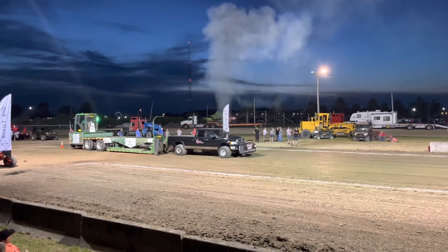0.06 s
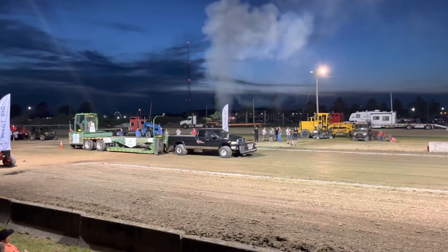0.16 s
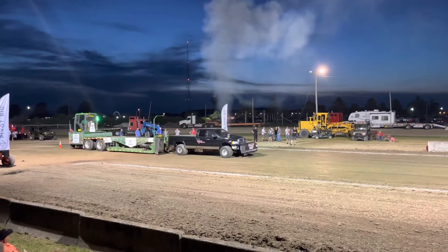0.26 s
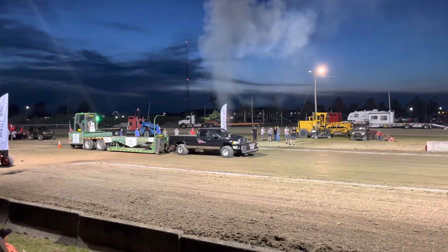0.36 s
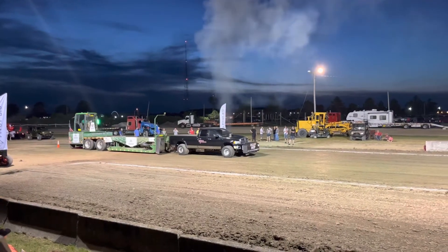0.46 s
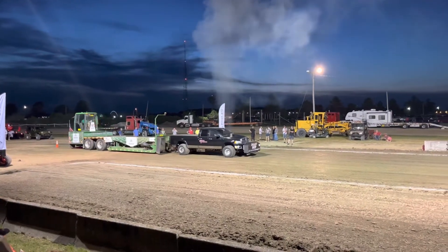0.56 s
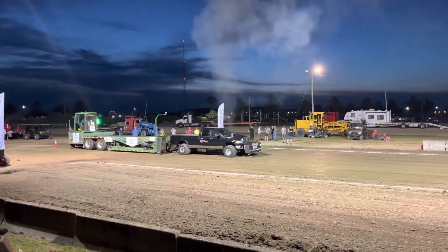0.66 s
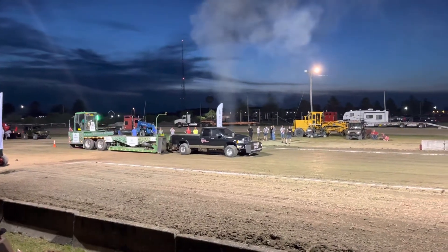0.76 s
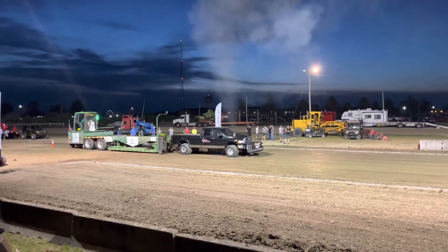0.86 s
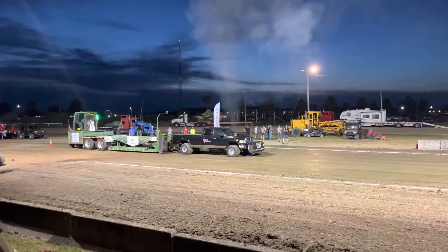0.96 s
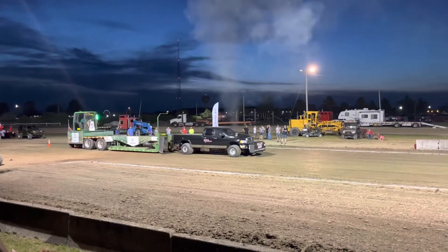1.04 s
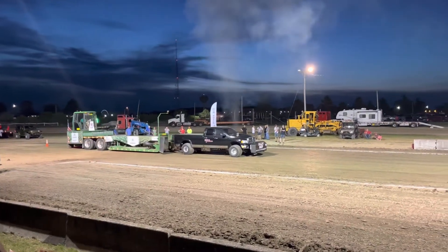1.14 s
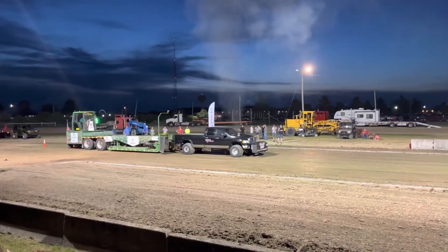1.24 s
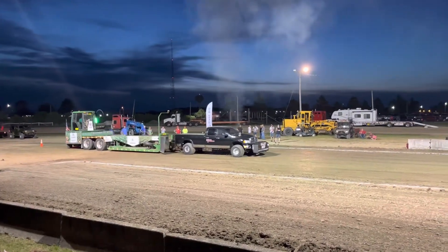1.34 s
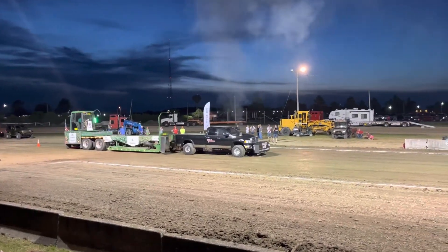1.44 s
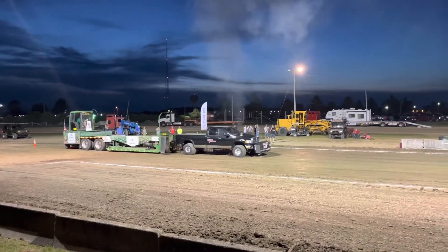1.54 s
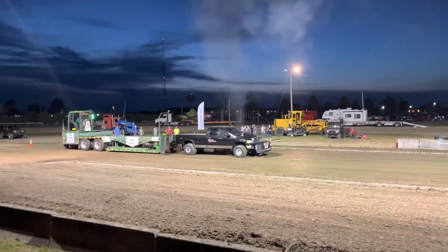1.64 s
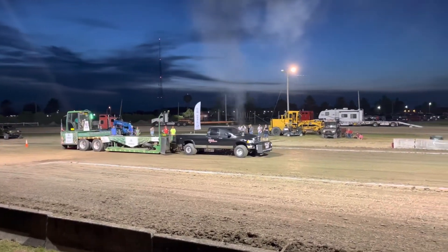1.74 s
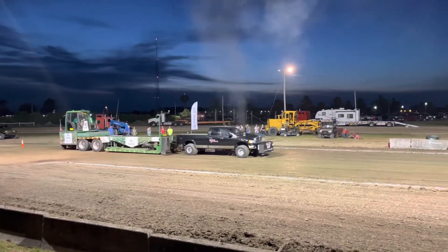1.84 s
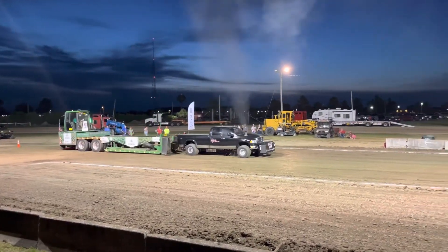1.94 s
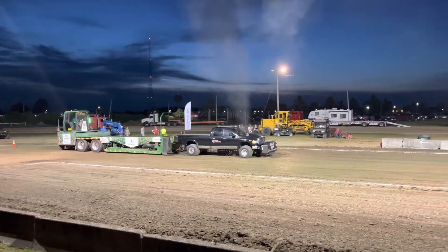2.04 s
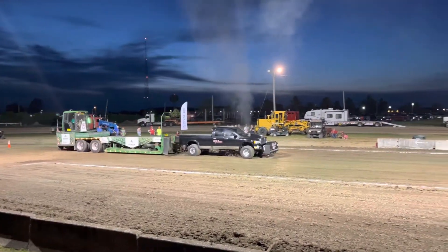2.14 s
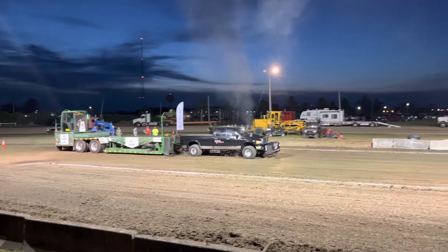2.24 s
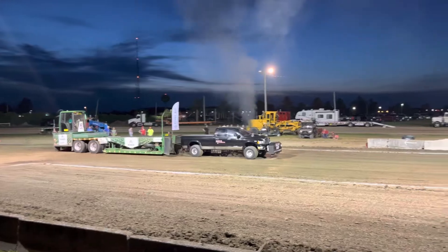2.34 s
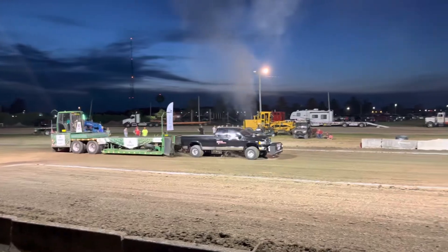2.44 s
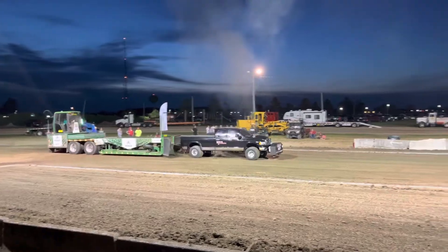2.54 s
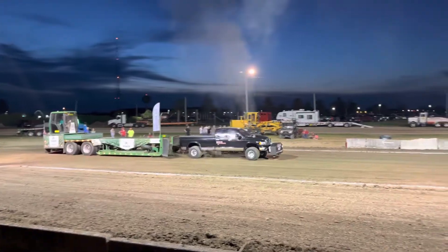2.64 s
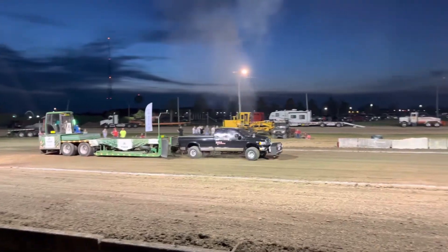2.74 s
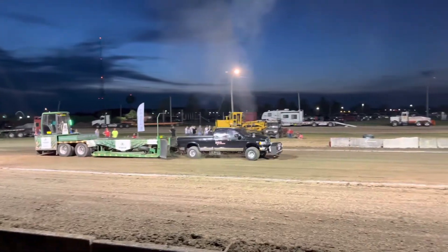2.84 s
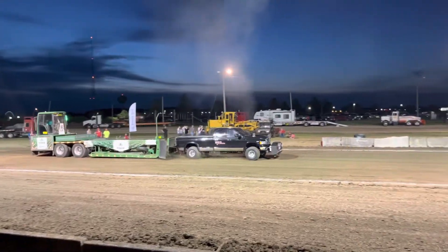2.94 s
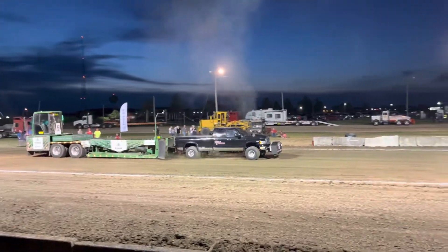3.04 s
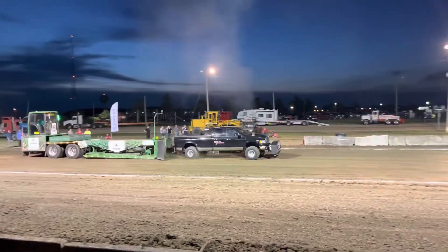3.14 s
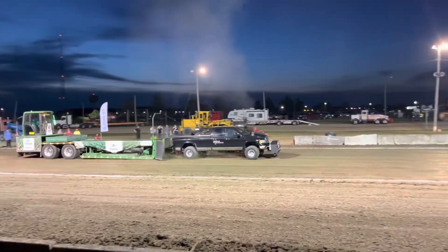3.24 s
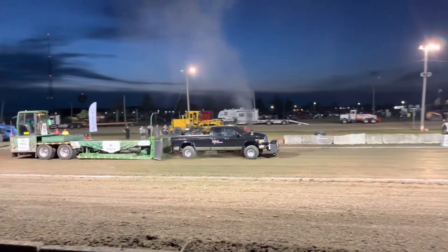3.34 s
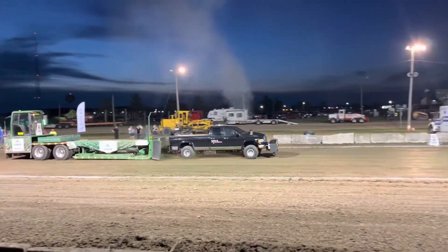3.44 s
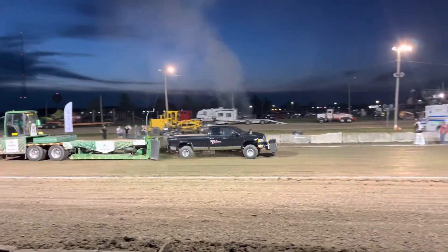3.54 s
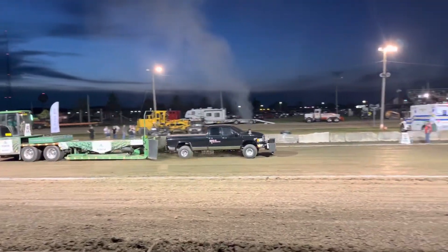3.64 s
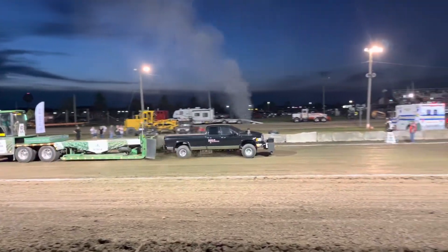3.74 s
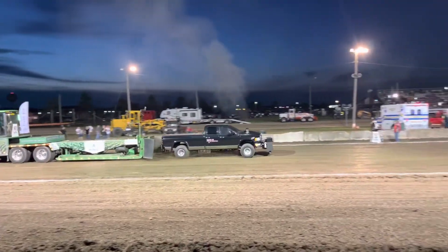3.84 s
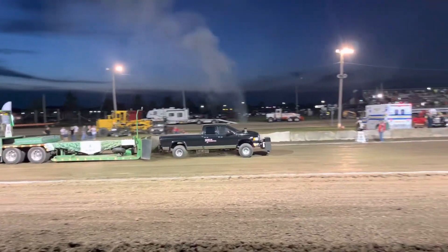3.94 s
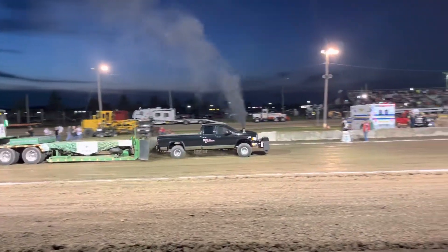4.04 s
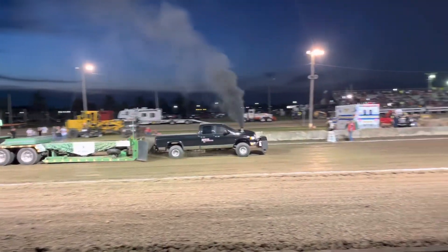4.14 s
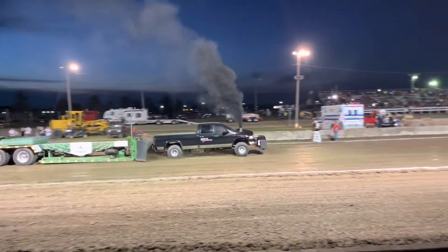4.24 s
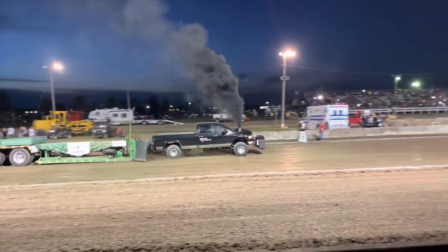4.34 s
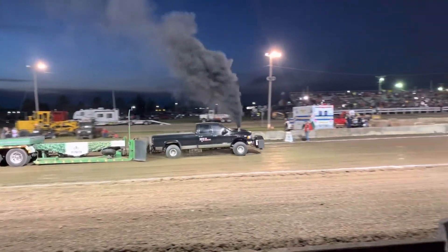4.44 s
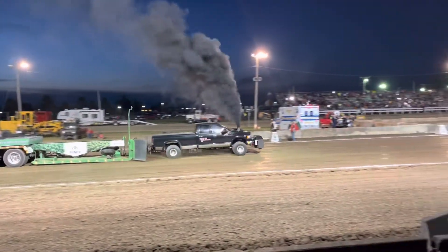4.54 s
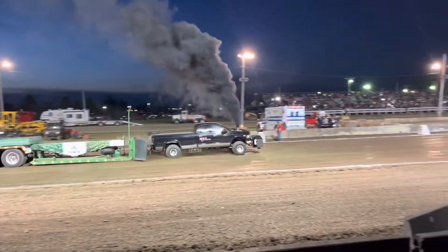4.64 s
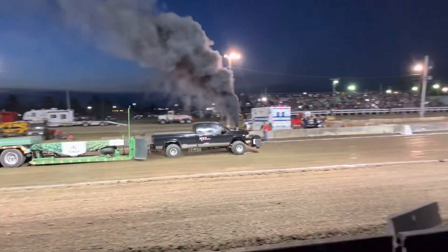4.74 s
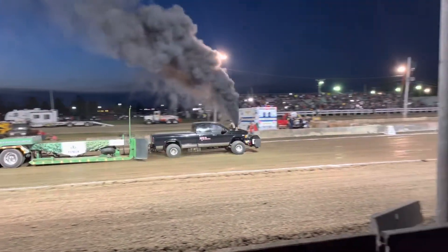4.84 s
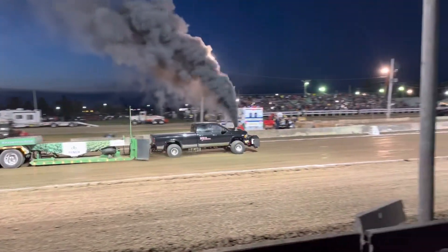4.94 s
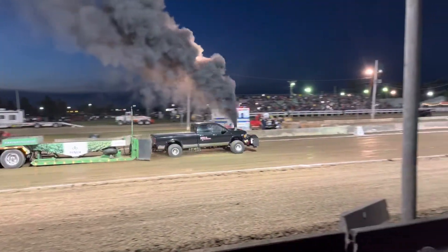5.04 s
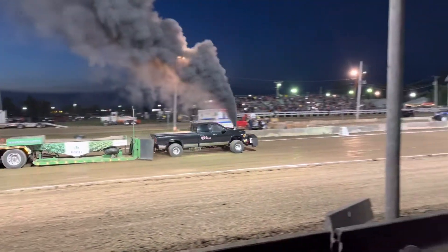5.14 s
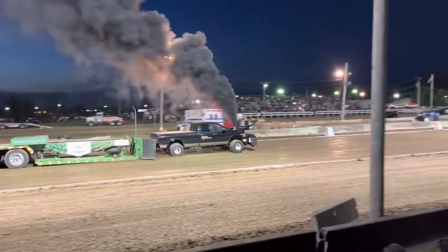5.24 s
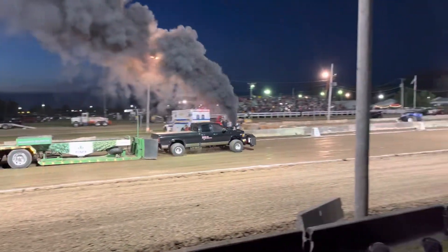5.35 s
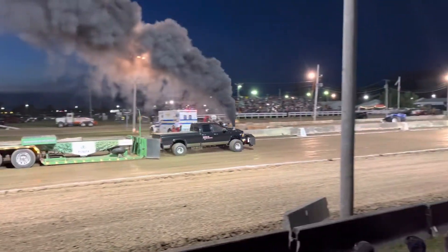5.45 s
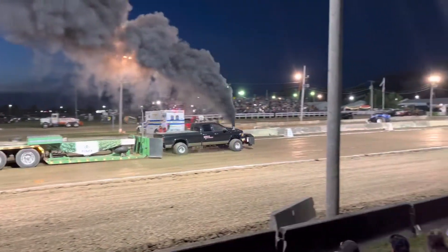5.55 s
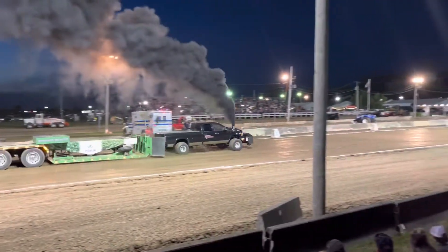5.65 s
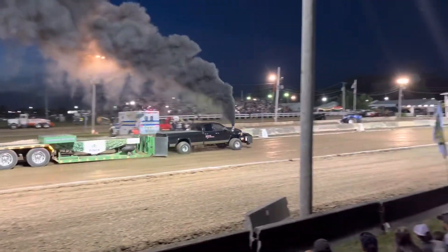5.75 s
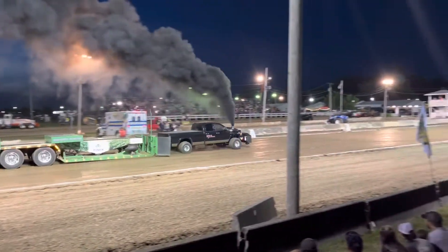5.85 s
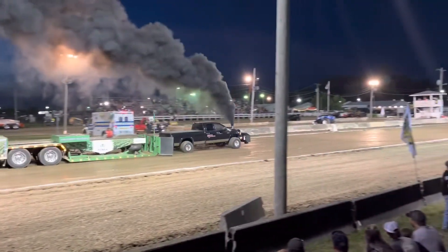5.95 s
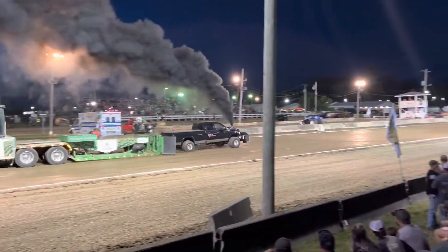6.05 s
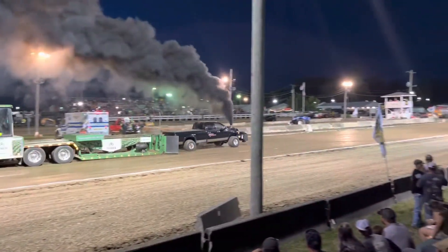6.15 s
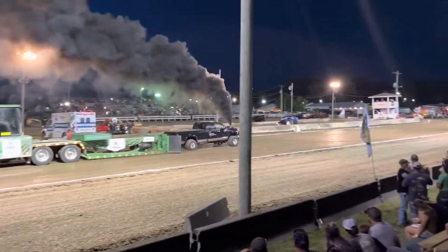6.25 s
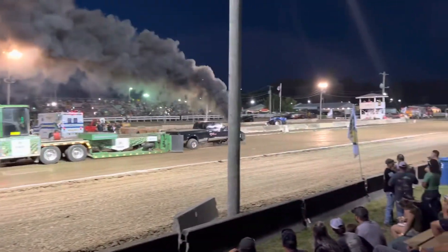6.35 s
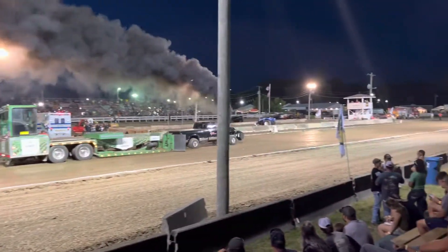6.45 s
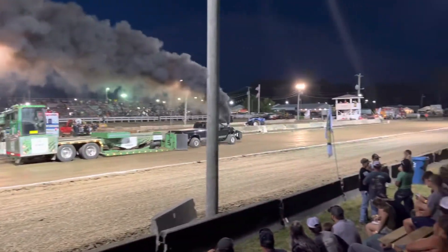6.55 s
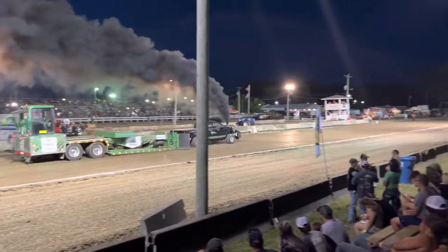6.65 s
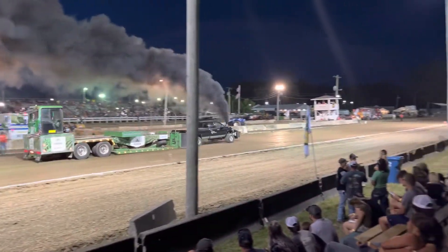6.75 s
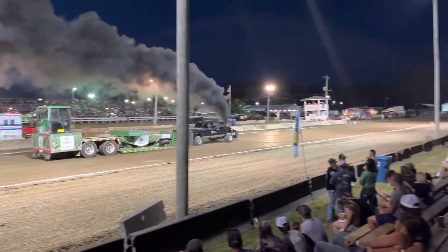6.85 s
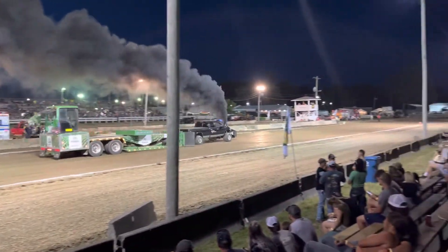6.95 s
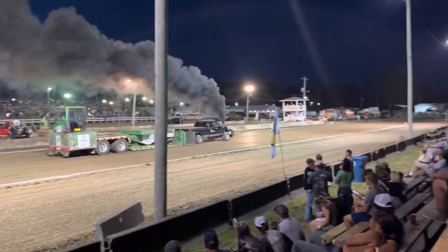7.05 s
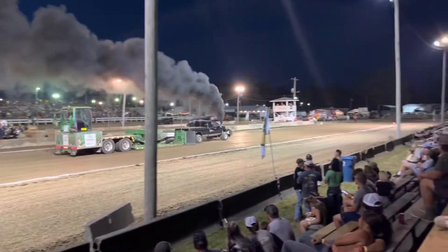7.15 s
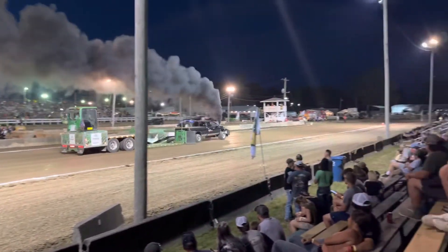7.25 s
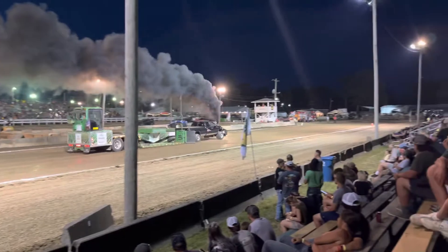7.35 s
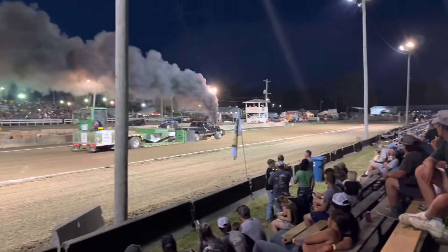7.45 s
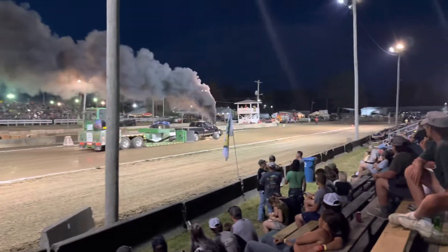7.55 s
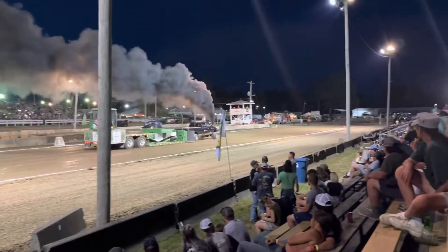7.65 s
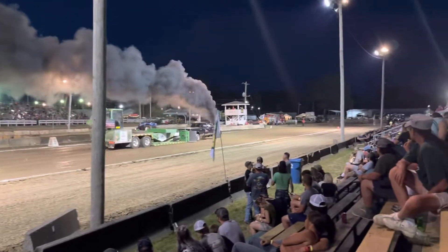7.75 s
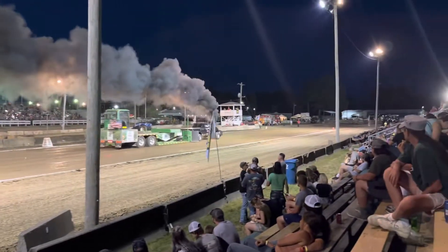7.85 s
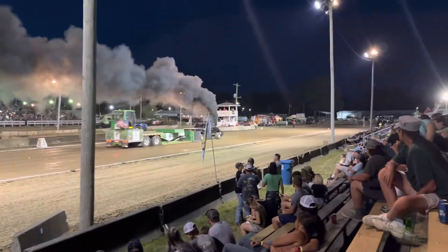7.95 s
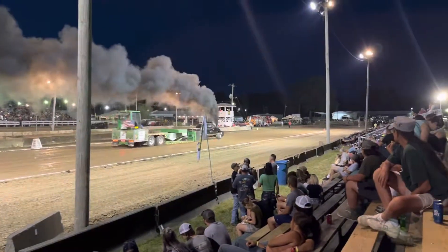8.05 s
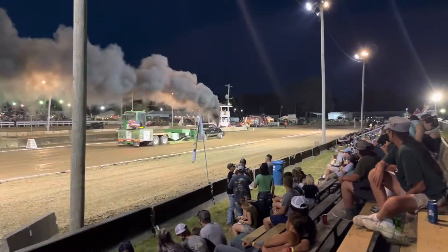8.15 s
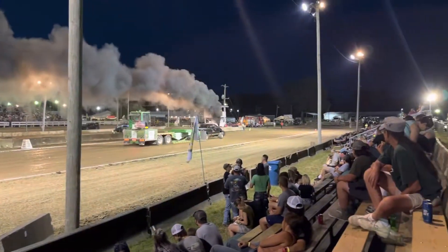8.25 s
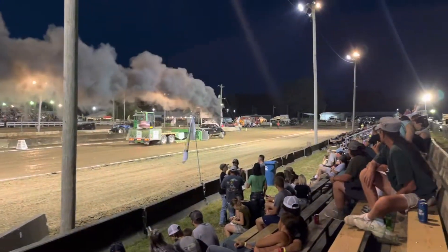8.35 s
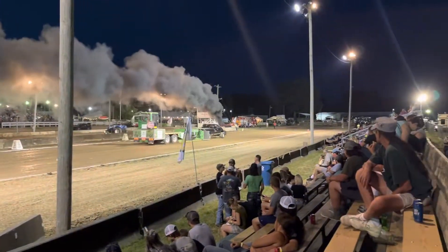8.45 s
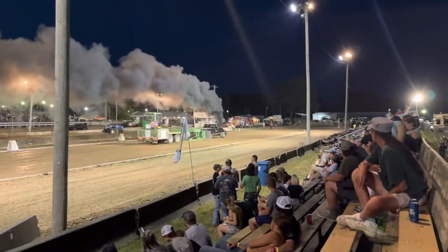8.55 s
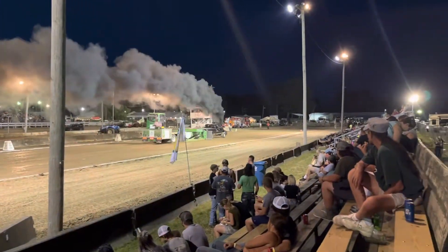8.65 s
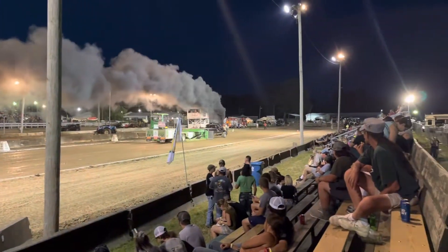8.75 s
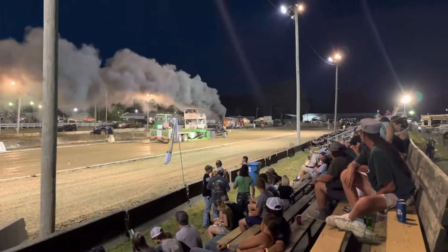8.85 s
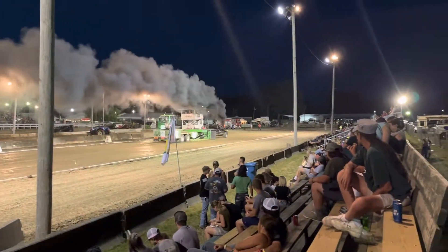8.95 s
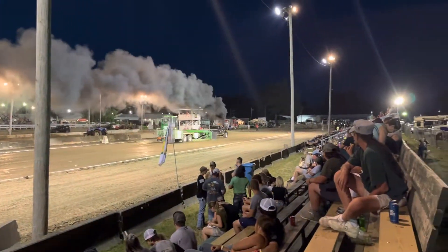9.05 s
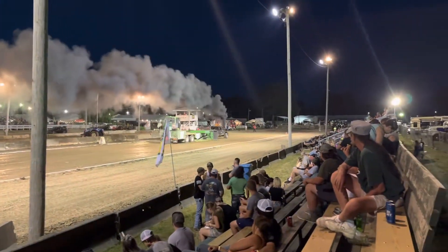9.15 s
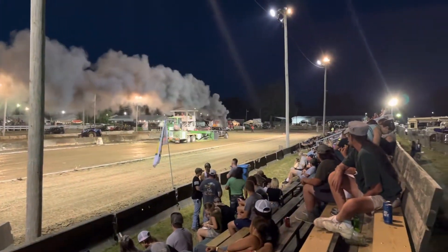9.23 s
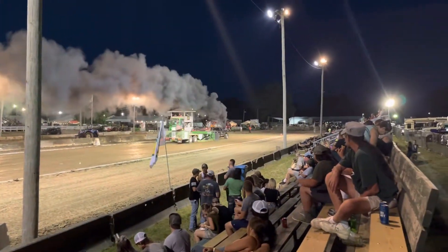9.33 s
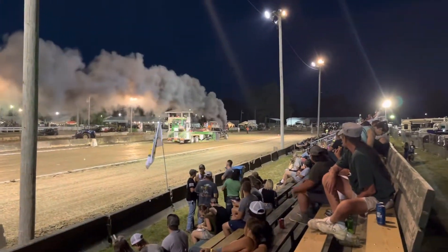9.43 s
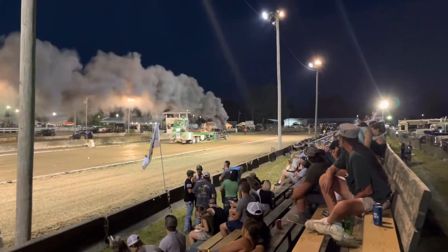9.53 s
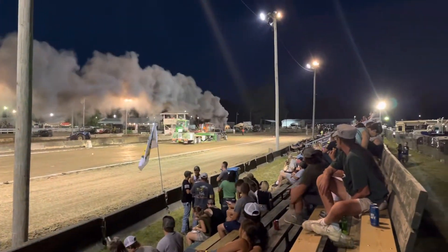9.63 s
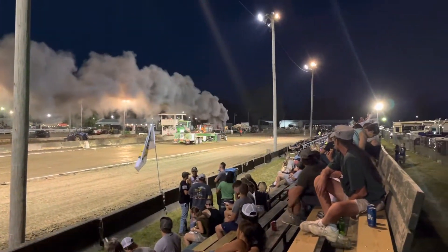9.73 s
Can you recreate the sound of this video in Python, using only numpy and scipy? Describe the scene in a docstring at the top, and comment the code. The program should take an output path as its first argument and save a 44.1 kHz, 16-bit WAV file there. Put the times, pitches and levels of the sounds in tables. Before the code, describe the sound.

Continuous full-throttle diesel engine dragging a weight sled outdoors. The dense, rasping drone grows barkier alongside the listener, wavers through several rapid rev surges around the middle, drops in pitch, then climbs back and holds while moving away. Treble hiss and turbo whistle thin out; low rumble and a soft echo off ground and stands remain. Small stereo microphone in the spectator seats.

```python
"""A diesel exhaust blares at its firing rate, rough and barking, under a turbo whistle: a six-cylinder truck
drags a weight sled down a dirt track at full throttle. Revs swell gently, then surge as the tyres slip and
bite; the truck draws away and turns duller. Crank orders are shaken tones; bark, rasp and hiss are noise
puffed once per firing; the whistle is a gliding narrow band. Rumble, a steady low drone, a ground echo and
a grandstand tail surround them."""
import sys
import numpy as np
from scipy import signal
from scipy.fft import rfft, irfft, next_fast_len
from scipy.io import wavfile
from scipy.ndimage import map_coordinates

SR = 44100
rng = np.random.default_rng(int(sys.argv[2]) if len(sys.argv) > 2 else 0)


def materialize(psi):
    """Save the field psi as 16-bit PCM at rate SR to the path in sys.argv[1].

    A 1-D psi becomes a single channel; in a 2-D psi each row is a channel.
    """
    bounded = np.clip(np.atleast_2d(psi).T, -1, 1)
    quanta = np.round(bounded * 32767).astype(np.int16)
    wavfile.write(sys.argv[1], SR, quanta)


N = 431738


def from_db(db):
    """Amplitude factor for a level in dB."""
    return np.exp(np.asarray(db) * (np.log(10) / 20))


def rms_one(x):
    """Scale to rms 1."""
    return x / np.sqrt(np.mean(x ** 2) + 1e-20)


def in_time(rows):
    """Columns of a curve (time [s], ...), interpolated to every sample."""
    time_s, *columns = np.transpose(rows)
    return [np.interp(np.arange(N) / SR, time_s, column) for column in columns]


def drift(rate_hz):
    """Slow chance, rms 1: noise through two equal poles at rate_hz, run at SR / 40."""
    step, settle = 40, 2000
    pole = np.exp(-2 * np.pi * rate_hz * step / SR)
    noise = rng.standard_normal(N // step + settle + 2)
    slow = signal.lfilter([1], [1, -2 * pole, pole ** 2], noise)[settle:]
    return np.interp(np.arange(N) / step, np.arange(len(slow)), rms_one(slow))


def colour(x, spectrum, turn=1):
    """Filter by (frequency [Hz], gain [dB]) over log frequency; turn is a common phase factor."""
    size = next_fast_len(N + SR // 10)
    hz, db = np.transpose(spectrum)
    log_hz = np.log(np.maximum(np.fft.rfftfreq(size, 1 / SR), 1))
    gain = from_db(np.interp(log_hz, np.log(hz), db))
    return irfft(rfft(x, size) * gain * turn, size)[..., :N]


def band(x, spectrum):
    """Filter by a spectrum that closes off steeply past both ends; rms 1."""
    low_end = (spectrum[0][0] / 2, -90)
    high_end = (spectrum[-1][0] * 2, -90)
    return rms_one(colour(x, [low_end, *spectrum, high_end]))


def at_place(values, place):
    """Blend values for approaching, alongside and far off."""
    return np.interp(place, range(len(values)), values)


def blend_places(shape, spectra, place):
    """Crossfade the signals that shape() makes from each place's spectrum."""
    hz, *by_place = np.transpose(spectra)
    blend = 0
    for k, db in enumerate(by_place):
        weight = np.maximum(1 - abs(place - k), 0)
        blend = blend + weight * shape(list(zip(hz, db)))
    return blend


def turning_band(x, spectra, place):
    """Band colour turns as the truck goes by."""
    return blend_places(lambda spectrum: band(x, spectrum), spectra, place)


# truck position: (time [s], place [0 approaching, 1 alongside, 2 and over far off])
TRACK_PLACE = [(0, 0), (1.4, 0.07), (2.2, 0.5), (3.7, 0.9), (5, 1.3), (5.7, 1.6), (6.2, 2), (9.79, 3)]


def track_place():
    """Place along the track, held at far off once reached."""
    place, = in_time(TRACK_PLACE)
    return np.clip(place, 0, 2)


# crank speed that sled drag allows while the tyres grip: (time [s], speed [turns/s])
LOADED_SPEED = [(0.0, 72.1), (0.44, 70.9), (1.58, 70.4), (2.29, 68.0), (3.34, 67.0), (3.63, 69.8),
                (4.25, 69.2), (5.19, 71.5), (5.69, 62.6), (6.13, 60.3), (6.56, 59.7), (7.36, 67.5),
                (8.61, 67.7), (9.15, 66.4), (9.79, 66.2)]


def loaded_speed():
    """Crank speed under the sled's drag, without surges."""
    return in_time(LOADED_SPEED)[0]


# surges and gentle swells of the revs: (time of top [s], rise [turns/s], length [s])
REV_SURGES = [(2.62, 1.5, 0.72), (2.92, 2.1, 0.3), (3.16, 2.1, 0.35), (3.47, 4.2, 0.31), (3.86, 3.8, 0.44),
              (4.5, 17.2, 0.63), (4.93, 14.8, 0.53), (5.41, 16.0, 0.46), (5.85, 8.4, 0.46),
              (6.34, 6.4, 0.41), (6.77, 2.6, 0.44), (7.88, 1.4, 0.22), (8.15, 1.6, 0.25), (8.74, 1.9, 0.23),
              (9.01, 3.2, 0.29), (9.36, 5.2, 0.36)]
WOBBLE_SHARE, WOBBLE_HZ = 0.001498, 4.05


def crank_speed():
    """Turns per second: loaded speed, rounded surges and gentle swells, and a slight wobble."""
    t = np.arange(N) / SR
    speed = loaded_speed()
    for top_s, rise, length_s in REV_SURGES:
        half_turns = np.clip((t - top_s) / length_s, -.5, .5)
        speed = speed + rise * np.cos(np.pi * half_turns) ** 2
    return speed * (1 + WOBBLE_SHARE * drift(WOBBLE_HZ))


def crank_turns(speed):
    """Crank angle in turns: speed summed, with fine unsteadiness."""
    return np.cumsum(speed * (1 + .0015 * drift(20))) / SR


# low drone spectrum, peak around the truck's crank rate: (frequency [Hz], level [dB per Hz])
DRONE_SPECTRUM = [(22, -34), (40, -18), (63, 3), (85, -9), (110, -2), (160, -17), (300, -10)]


def low_drone():
    """Steady low noise around 63 Hz, near the truck's crank rate, that stays as the truck leaves."""
    return from_db(-47.5) * band(rng.standard_normal((2, N)), DRONE_SPECTRUM)


def grandstand(x, t60_s, wall_hz):
    """Thin, dull tail scattered by the stands: two unrelated decaying noise rows, as strong as x."""
    t = np.arange(SR) / SR
    decay = from_db(-60 * t / t60_s) * (t > .03)
    tail = rng.standard_normal((2, SR)) * decay
    tail = signal.sosfilt(signal.butter(1, wall_hz, fs=SR, output="sos"), tail)
    return rms_one(signal.fftconvolve(x[None], tail, axes=1)[:, :N]) * np.std(x)


# echo delay, longest about when the truck is alongside: (time [s], lag [s])
GROUND_LAG = [(0, .00184), (.8, .00187), (2.25, .00202), (2.9, .00218), (4.15, .00278), (6.05, .00208),
              (6.5, .00192), (7.1, .00178), (8.4, .00164), (9.79, .0016)]


def ground_echo(x, share, dull_hz):
    """A dulled bounce off the track combs the sound; the comb slides as the lag changes."""
    lag_s, = in_time(GROUND_LAG)
    now = np.arange(N)
    dulled = colour(x, [(dull_hz / 2, 0), (dull_hz, -3), (2 * dull_hz, -20)])
    late = np.array([np.interp(now - lag_s * SR, now, row) for row in dulled])
    return x + share * late


def shocks(crank, size=630):
    """Ragged gas burst repeated every crank turn, as cylinders empty alike each time."""
    burst = rng.standard_normal(size)
    repeated = map_coordinates(burst, [crank % 1 * size], order=1, mode="grid-wrap")
    return repeated * np.sqrt(3 / 2)  # restores power lost to interpolation


# puff strength per cylinder, in firing order: (level [dB])
CYLINDER_STRENGTH = [2.2, -.4, -2.6, 1.9, -.7, -2.1]


def puffs(crank, sharpness, scatter_db, steady, repeating):
    """Gas noise puffed three times a turn as cylinders empty; row 0 direct, row 1 scattered."""
    firing = (3 * crank).astype(int)
    cylinder_db = np.take(CYLINDER_STRENGTH, firing, mode="wrap")
    strength_db = cylinder_db + scatter_db * rng.standard_normal(N // 100)[firing]
    phase_turns = 3 * crank - firing - .5
    opening = np.exp(sharpness * (np.cos(2 * np.pi * phase_turns) - 1))
    gas = rng.standard_normal((2, N)) + repeating * np.array([shocks(crank), shocks(crank)])
    return (steady + from_db(strength_db) * opening) * gas


# treble level, comes and goes at a distance: (time [s], level [dB])
TREBLE_LEVEL = [(0.0, -33.5), (0.16, -35), (1.41, -37), (1.68, -34), (2.62, -37.5), (4.3, -38), (6.18, -41),
                (6.34, -46), (7.24, -40.5), (7.72, -51.5), (8.14, -43.5), (8.35, -53.5), (8.5, -47),
                (8.92, -52), (9.28, -49), (9.78, -54.5)]


def treble_level_db():
    """Level of the hiss, and reference for the turbo whistle."""
    return in_time(TREBLE_LEVEL)[0]


# hiss spectra: (frequency [Hz], approaching, alongside, far off [dB per Hz])
HISS_SPECTRA = [(3280, -53, -45, -7), (4400, 0.5, 7.5, 6.5), (5000, -1, 5, 6), (5900, 3, 5, 4.5),
                (6190, 6, 10.5, 8), (7560, -1.5, 3.5, -1), (7380, 3, 10, -8), (8690, -42, -44, -47),
                (9035, -5.5, -1.5, -5), (10750, -1.5, 3.5, -0.5), (12700, -4.5, -1.5, -6),
                (14360, -9.5, -5, -10), (14700, -38, -36, -28)]


def hiss(crank, place, hiss_db):
    """Treble gas noise, puffed over a strong steady flow; moving air makes it flutter."""
    gas = puffs(crank, sharpness=0.92, scatter_db=3.0, steady=1.9, repeating=0.25)
    noise = from_db(hiss_db) * turning_band(gas, HISS_SPECTRA, place)
    fluttering = noise * from_db(0.92 * drift(13.5))
    return ground_echo(fluttering, share=0.48, dull_hz=7000)


# turbo spool, swings a little behind the revs: (time [s], frequency [Hz], level re hiss before trim [dB])
TURBO_SPOOL = [(0, 9650, -20), (1.5, 10200, -14), (2.45, 11000, -17), (2.9, 11000, -21), (3.45, 11450, -13),
               (3.6, 11150, -12), (3.75, 11380, -11), (3.95, 11200, -18), (4.3, 11480, -14),
               (4.55, 12150, -18), (4.8, 11800, -19), (5.03, 12000, -20), (5.25, 11380, -15),
               (5.48, 11800, -13), (5.62, 11300, -12), (5.75, 10850, -17), (6, 11050, -16),
               (6.2, 10600, -16), (7.8, 11400, -19), (9.79, 10800, -28)]
TURBO_TRIM_DB, TURBO_FLICKER_DB, TURBO_FLICKER_HZ = -1, 3.5, 9


def turbo(hiss_db, width_hz=90):
    """Whistle: a narrow gliding band of turbulence that comes and goes."""
    hz, spool_db = in_time(TURBO_SPOOL)
    angle = 2 * np.pi * np.cumsum(hz) / SR
    whistle = rms_one(drift(width_hz) * np.cos(angle) + drift(width_hz) * np.sin(angle))
    flicker_db = TURBO_FLICKER_DB * drift(TURBO_FLICKER_HZ)
    return from_db(hiss_db + spool_db + TURBO_TRIM_DB + flicker_db) * whistle


# bark level as the truck passes and leaves, reference for rumble and lesser orders: (time [s], level [dB])
BARK_LEVEL = [(0.0, -27), (1.3, -28), (2.12, -22.5), (2.55, -25), (3.82, -24.5), (3.9, -29), (3.94, -28),
              (3.955, -22.5), (4.0, -23), (4.17, -29), (4.4, -28), (4.7, -30.5), (5.15, -33), (5.4, -30.5),
              (5.65, -34.5), (5.82, -30), (6.15, -36.5), (6.35, -33), (6.65, -37.5), (7.2, -36.5),
              (7.8, -40), (8.6, -40), (9.79, -43)]


def bark_level_db():
    """Reference level of the exhaust."""
    return in_time(BARK_LEVEL)[0]


# rumble spectrum: (frequency [Hz], level [dB per Hz])
RUMBLE_SPECTRUM = [(20, -33), (35, -16), (50, -19), (68, -14), (88, -6), (108, -2), (135, -1), (170, 2),
                   (250, 2), (330, 1.5), (450, -1), (560, -30), (750, -38)]
# rumble re bark level: (approaching, alongside, far off [dB])
RUMBLE_BY_PLACE = [-6, -11, -7]


def rumble(place, bark_db):
    """Low noise that follows the bark level."""
    rumble_db = bark_db + at_place(RUMBLE_BY_PLACE, place)
    return from_db(rumble_db) * band(rng.standard_normal((2, N)), RUMBLE_SPECTRUM)


# rasp level: (time [s], level [dB])
RASP_LEVEL = [(0, -29.5), (1.3, -30.5), (2.2, -28.5), (2.7, -30), (3.75, -29.5), (4.7, -32), (5.5, -34),
              (6.2, -37), (6.65, -39.5), (7.22, -35), (7.6, -42), (8.2, -41), (8.5, -40), (8.9, -43.5),
              (9.79, -46.5)]
# rasp spectra: (frequency [Hz], approaching, alongside, far off [dB per Hz])
RASP_SPECTRA = [(895, 3.5, -22, 2.5), (1165, -8.5, -8, 4), (1403, -1.5, -2.5, 2.5), (1573, 4.5, 6.5, 5),
                (1863, -1.5, -3, 0), (2090, -4.5, -11.5, -0.5), (2174, -8.5, -6.5, -7.5),
                (2586, 2.5, 2.5, 4), (2804, -6, -9.5, -1.5), (2710, 1, -10.5, -18), (3250, -6.5, -4.5, 0.5),
                (3740, 2.5, -10, -18), (3910, -11, -8.5, -9.5), (5240, -22, -46, -28)]


def rasp(crank, place):
    """Upper-mid gas noise, puffed, with part of each burst repeating every turn."""
    gas = puffs(crank, sharpness=1.3, scatter_db=1.2, steady=1.3, repeating=.35)
    rasp_db, = in_time(RASP_LEVEL)
    return from_db(rasp_db) * turning_band(gas, RASP_SPECTRA, place)


# bark spectra: (frequency [Hz], approaching, alongside, far off [dB per Hz])
BARK_SPECTRA = [(250, -39, -25, -9), (330, -18, -7, -13), (466, -2, 4, 7), (534, 6.5, -7, 1),
                (695, 5, 2.5, 4), (890, 11, 8.5, 2), (1006, 9.5, -4, 5.5), (1127, 7, -6, 5),
                (1170, -22, -18, -11), (1500, -27, -37, -45)]
# extra roar as the revs rise: (frequency [Hz], level [dB per Hz])
SURGE_ROAR_SPECTRUM = [(560, -25), (740, -4), (880, 1), (1050, 1), (1130, -25)]
BARK_TRIM_DB, SURGE_ROAR_DB = -8, -12.5  # re bark level
SURGE_FULL_TURNS_PER_S = 5.3  # rise over loaded speed for full surge roar


def bark(crank, speed, place, bark_db):
    """Mid gas noise puffed by each firing, plus a roar as the revs rise over the loaded speed."""
    gas = puffs(crank, sharpness=1.1, scatter_db=.5, steady=.45, repeating=0)
    surge = np.clip((speed - loaded_speed()) / SURGE_FULL_TURNS_PER_S, 0, 1)
    noise = from_db(bark_db + BARK_TRIM_DB) * turning_band(gas, BARK_SPECTRA, place)
    return noise + from_db(bark_db + SURGE_ROAR_DB) * surge * band(gas, SURGE_ROAR_SPECTRUM)


ROAR_FLUTTER_DB, ROAR_FLUTTER_HZ = 0.94, 11


def roar(crank, speed, place, bark_db):
    """Bark and rasp swell and sink together."""
    gas_noise = bark(crank, speed, place, bark_db) + rasp(crank, place)
    return gas_noise * from_db(ROAR_FLUTTER_DB * drift(ROAR_FLUTTER_HZ))


def order_tone(cycle, multiple, shimmer, shimmer_hz):
    """One crank order, shaken in strength and phase by uneven burning; scaled to rms 1."""
    # orders between the firing multiples come from uneven timing
    uneven = np.pi * (.28 * (multiple % 3 > 0) + multiple % 1)
    angle = 2 * np.pi * multiple * (cycle - 1 / 6) - np.pi / 2 + uneven
    in_phase = (1 + shimmer * drift(shimmer_hz)) * np.cos(angle)
    quadrature = shimmer * drift(shimmer_hz) * np.sin(angle)
    return (in_phase + quadrature) / np.sqrt(.5 + shimmer ** 2)


# firing note, order 3: (time [s], level [dB])
FIRING_LEVEL = [(0.0, -14), (0.96, -16.5), (1.2, -14.5), (1.78, -15), (2.06, -13.5), (2.52, -17.5),
                (3.28, -14.5), (3.76, -19.6), (3.84, -14.1), (3.9, -19.0), (3.98, -14.3), (4.12, -20.9),
                (4.38, -16.1), (4.5, -19), (4.62, -16.7), (4.76, -21.8), (5.0, -17), (5.06, -22.9),
                (5.16, -19.2), (5.54, -22.0), (5.72, -27), (5.8, -18.5), (5.88, -19.1), (5.96, -26),
                (6.34, -22.9), (6.6, -25.5), (6.92, -24.9), (6.98, -28.2), (7.1, -24.4), (7.28, -29.0),
                (7.58, -33.5), (7.74, -28.5), (7.84, -32.3), (7.92, -29.6), (7.96, -35.2), (8.04, -32.3),
                (8.2, -39), (8.28, -28), (8.34, -27), (8.44, -30.6), (8.56, -27.0), (8.76, -28.4),
                (8.8, -28), (8.84, -41), (9.02, -34.1), (9.14, -36), (9.2, -28), (9.4, -39.4),
                (9.48, -30.2), (9.52, -35.3), (9.64, -33.7), (9.78, -40)]
# its octave, order 6, before spin: (time [s], level [dB])
OCTAVE_LEVEL = [(0.0, -28.1), (0.16, -39), (0.22, -27), (0.52, -31.5), (0.84, -25), (1.28, -28.5),
                (1.38, -22.5), (1.54, -35), (1.7, -16.8), (2.62, -23), (2.7, -41), (2.82, -26), (3.16, -24),
                (3.44, -26), (3.48, -36.1), (3.72, -23.5), (3.86, -43.4), (3.9, -32), (4.1, -22.5),
                (4.58, -44.7), (4.74, -32), (4.9, -44), (5.16, -30.5), (5.4, -41.5), (5.56, -29),
                (5.7, -46.0), (5.76, -29.5), (6.42, -28.3), (6.62, -35.8), (6.7, -26.6), (7.12, -33),
                (7.86, -28.5), (8.5, -35.0), (8.58, -29.5), (9.1, -36.5), (9.78, -37)]
# lesser orders: (multiple of crank speed,
#   approaching, alongside, far off [dB re bark level, before lift], gain at full spin [dB])
LESSER_ORDERS = [(1, -15, -22, -12, 7), (1.5, -18, -24, -13, 0), (2, -9.5, -13, -8, -4),
                 (2.5, -21, -23, -19, -4), (3.5, -14, -21, -13, -5), (4, -6, -7.5, -7, -7),
                 (4.5, -22, -24, -10.5, -3), (5, -18, -14, -4.5, -1.5), (7, -17, -19, -9, -6),
                 (7.5, -22, -28, -26, 0), (8, -13, -16, -12, 4), (9, -11.5, -6, -7.5, 3.5),
                 (10, -15, -11, -16, -7), (10.5, -21, -18, -26, -4), (11, -13, -8.5, -14, -5),
                 (11.5, -18, -17, -25, -3), (12, -3.5, -5, -7.5, -3), (12.5, -15, -17, -24, -2),
                 (13, -6, -15, -16, 2), (13.5, -17, -22, -28, 0), (14, -9, -19, -14, -3),
                 (14.5, -17, -26, -26, 0), (15, -13, -18, -13, -7), (16, -16, -26, -21, -3),
                 (19, -18, -27, -27, 0), (22, -17, -20, -19, -10), (25, -23, -25, -28, -8)]
LESSER_LIFT_DB, SHIMMER, SHIMMER_PER_ORDER = 0.8, .2, .007
SPIN_TURNS_PER_S = 9  # rise over the starting speed at which the tyres spin freely
OCTAVE_SPIN_DB, OCTAVE_SPIN_SHIMMER = -2, .7
SWELL_LEAD_TURNS = .155  # low swell of each firing crests before its puff


def stack_notes(crank, speed, place, bark_db):
    """Stack tones: clean firing note, octave that breaks up in spin, lesser orders rougher with height."""
    spin = np.clip((speed - LOADED_SPEED[0][1]) / SPIN_TURNS_PER_S, 0, 1)
    cycle = (crank % 2).astype(np.float32)  # four strokes take two turns
    firing_db, = in_time(FIRING_LEVEL)
    octave_db, = in_time(OCTAVE_LEVEL)
    notes = from_db(firing_db) * order_tone(cycle + SWELL_LEAD_TURNS, 3, shimmer=0.024, shimmer_hz=25.3)
    octave_shimmer = 0.12 + OCTAVE_SPIN_SHIMMER * spin
    octave = order_tone(cycle, 6, shimmer=octave_shimmer, shimmer_hz=16)
    notes += from_db(octave_db + OCTAVE_SPIN_DB * spin) * octave
    for multiple, *by_place_db, spin_db in LESSER_ORDERS:
        order_db = bark_db + LESSER_LIFT_DB + at_place(by_place_db, place) + spin_db * spin
        order_shimmer = SHIMMER + SHIMMER_PER_ORDER * multiple
        notes += from_db(order_db) * order_tone(cycle, multiple, shimmer=order_shimmer, shimmer_hz=8)
    return notes


# port difference re sum: (frequency [Hz], approaching, alongside, far off [dB])
PORT_DIFFERENCE = [(100, -27, -27, -19), (200, -30, -28, -22), (400, -8.5, -14, -17.5), (690, -4, -6, -7),
                   (940, -8, -16, -18), (1190, 2, -8, -11), (1590, -8, -7, -7), (2000, -15, -19, -18),
                   (2600, -9, -8, -5.5), (3000, -2, 0.5, 4), (4170, 4, 5.5, 4), (6200, -5, -6, -11.5),
                   (7400, 4, 4, 6), (8400, 12, 12, 14), (9200, 14.5, 15, 16), (11000, -45, -45, -45),
                   (12500, -15, -15, -15), (14500, 11, 11, 11)]


def microphone(direct, scattered, alike, place):
    """Two ports: their difference is a quarter turn out of step, its strength set by frequency and place."""
    alike = np.clip(alike, 0, 1)
    between = np.sqrt(alike) * direct + np.sqrt(1 - alike) * scattered
    # 1j: quarter-turn phase
    side = blend_places(lambda spectrum: colour(between, spectrum, turn=1j), PORT_DIFFERENCE, place)
    return direct + side, direct - side


# port balance: (frequency [Hz], left re right [dB])
PORT_BALANCE = [(200, 0.1), (400, -0.5), (750, -1.5), (1400, -2), (2600, -2.5), (4800, 3), (6500, 0),
                (9000, 0)]


def balance(left, right):
    """Split the port imbalance evenly between the channels."""
    left_gain = [(hz, db / 2) for hz, db in PORT_BALANCE]
    right_gain = [(hz, -db / 2) for hz, db in PORT_BALANCE]
    return np.array([colour(left, left_gain), colour(right, right_gain)])


def scene():
    """Crank speed times the firing layers; place on the track sets their colours."""
    speed = crank_speed()
    crank = crank_turns(speed)
    place = track_place()
    bark_db, hiss_db = bark_level_db(), treble_level_db()
    sound = rumble(place, bark_db) + roar(crank, speed, place, bark_db) + hiss(crank, place, hiss_db)
    sound[0] += turbo(hiss_db)
    sound[0] += stack_notes(crank, speed, place, bark_db)
    sound += from_db(-15.5) * grandstand(sound[0], t60_s=0.83, wall_hz=2490)
    direct, scattered = sound + low_drone()
    left, right = microphone(direct, scattered, alike=0.42, place=place)
    return balance(left, right)


CUTOFF_HZ = 15200


def record(dry):
    """Steep elliptic low-pass cuts the top."""
    return signal.sosfilt(signal.ellip(10, .1, 80, CUTOFF_HZ, fs=SR, output="sos"), dry)


dry = scene()
out = record(dry)
materialize(out)
```